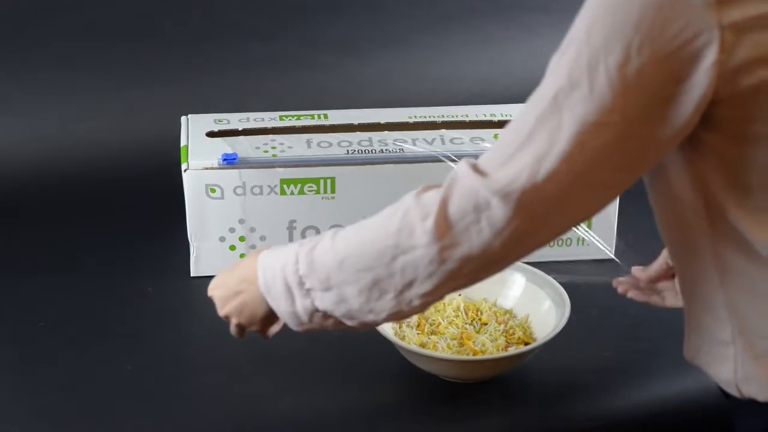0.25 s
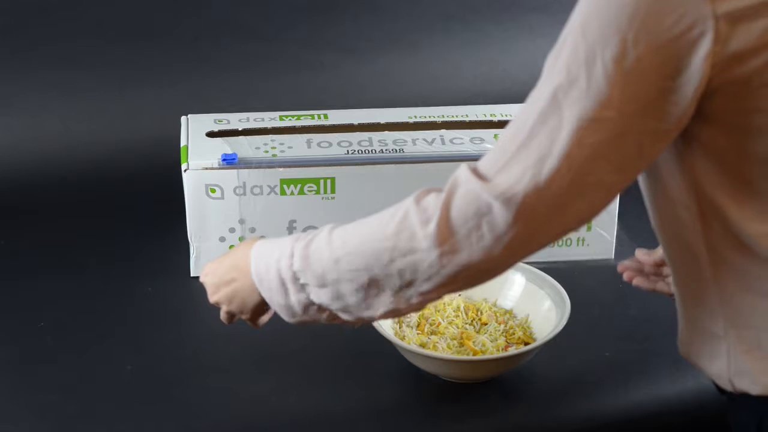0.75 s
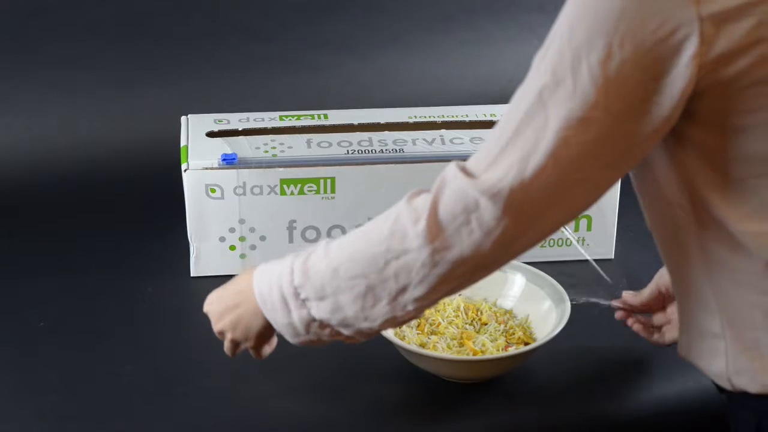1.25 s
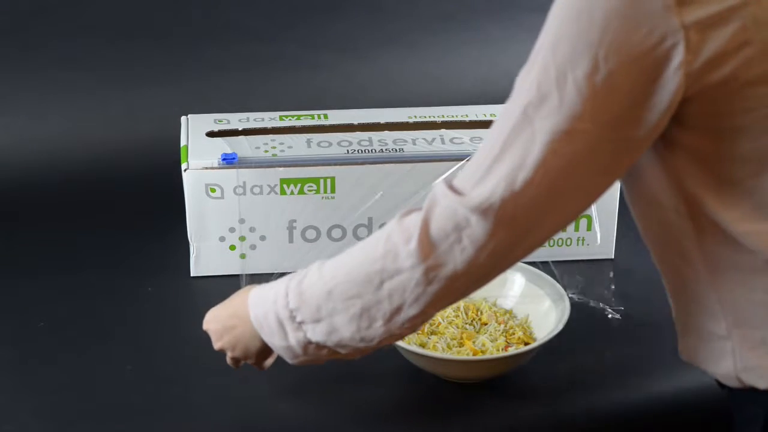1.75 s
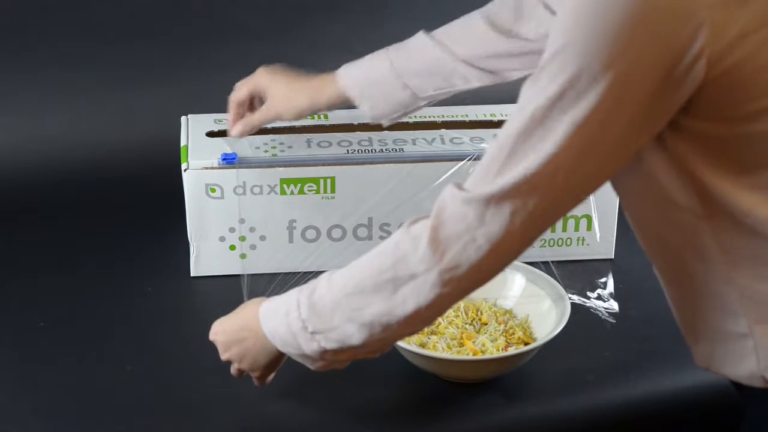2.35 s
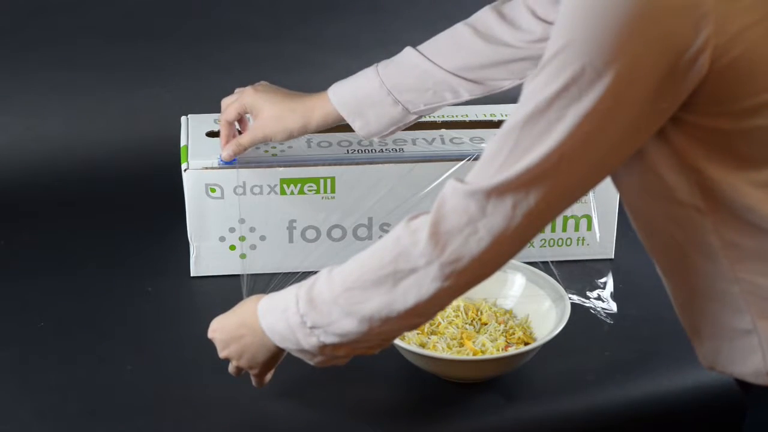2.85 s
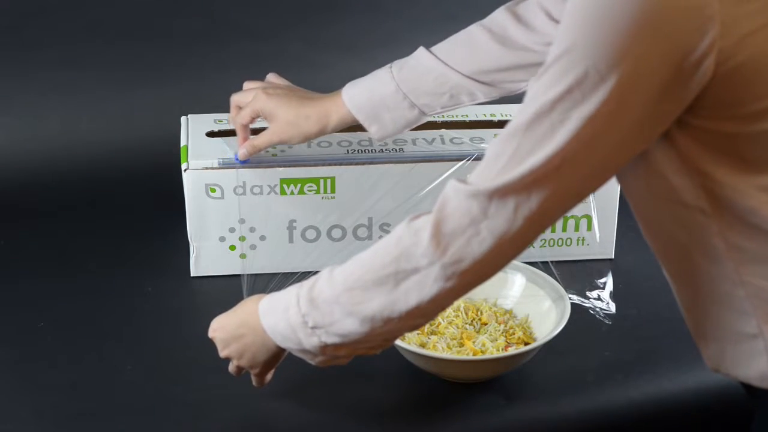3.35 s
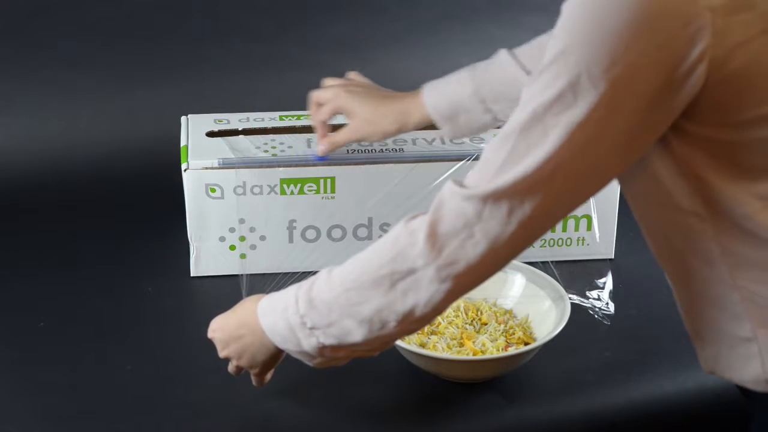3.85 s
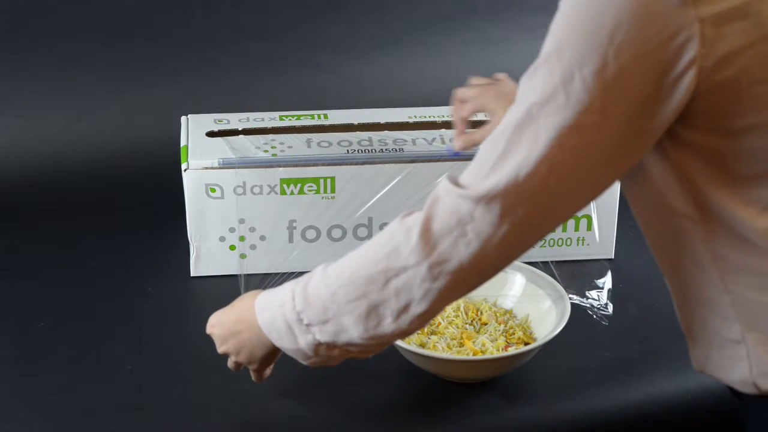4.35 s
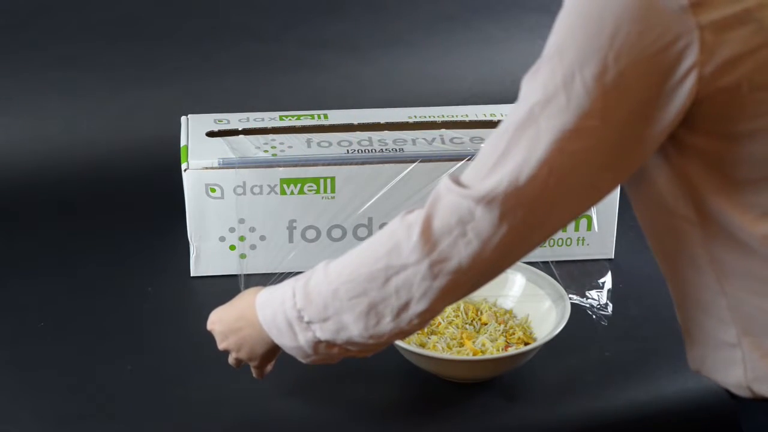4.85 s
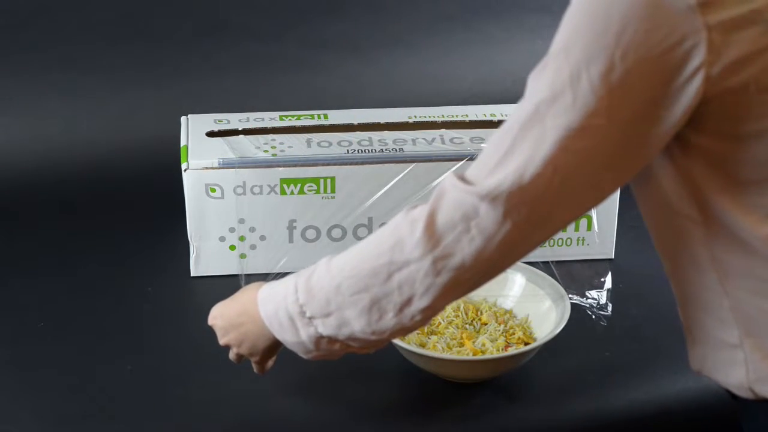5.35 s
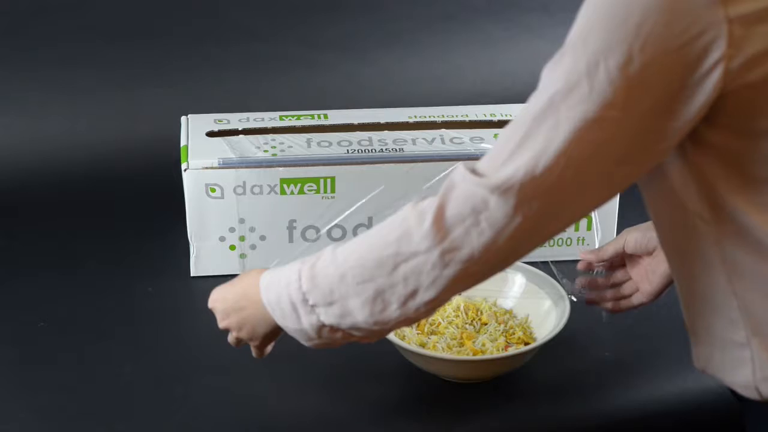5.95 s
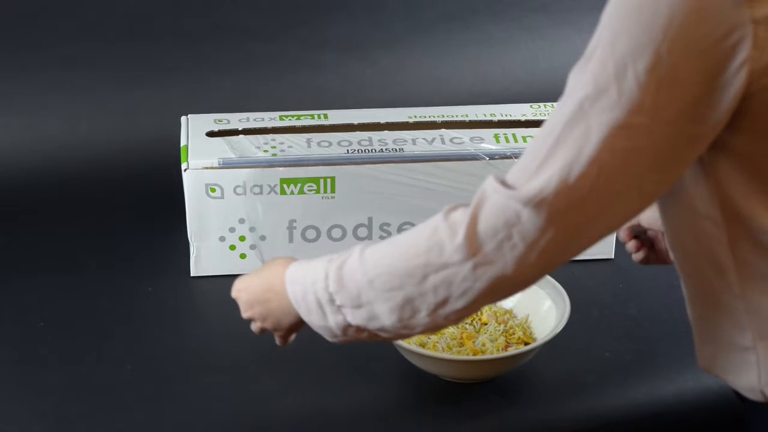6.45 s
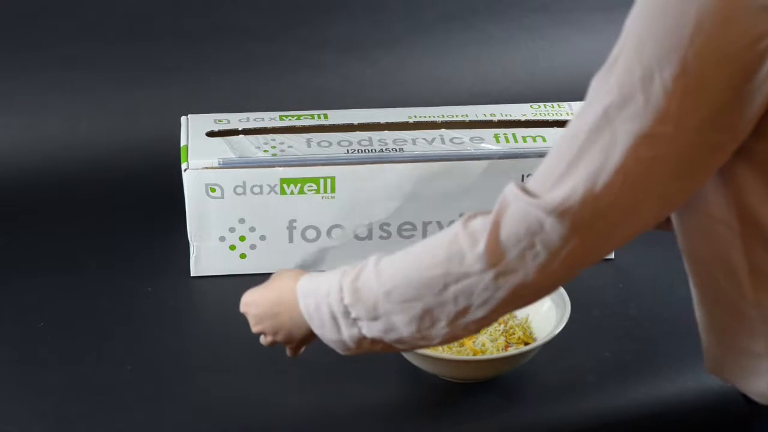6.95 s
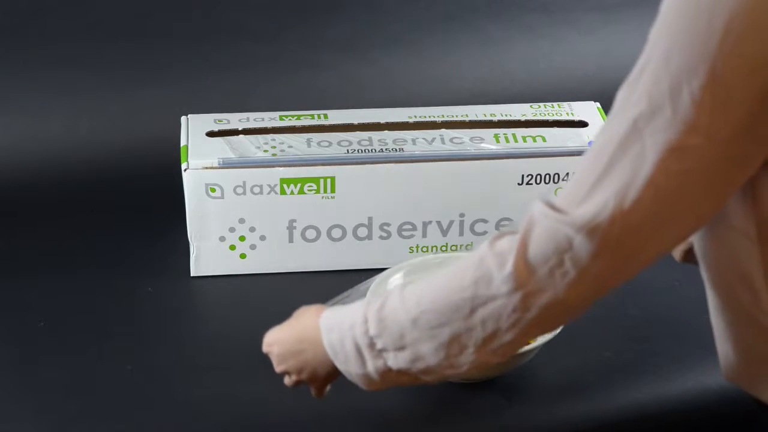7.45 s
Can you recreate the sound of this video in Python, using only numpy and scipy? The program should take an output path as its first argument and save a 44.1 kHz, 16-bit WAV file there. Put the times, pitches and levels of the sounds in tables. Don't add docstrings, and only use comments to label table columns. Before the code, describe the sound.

Crisp plastic wrap crackles, cutter clicks and a rising slicing hiss, then a flurry of sharp film snaps in a small room with faint hum.

```python
import sys
import numpy as np
from scipy import signal
from scipy.fft import rfft, irfft, next_fast_len
from scipy.io import wavfile
from scipy.ndimage import uniform_filter1d, map_coordinates

SR = 44100
rng = np.random.default_rng(int(sys.argv[2]) if len(sys.argv) > 2 else 0)


def master(y):
    cut = np.clip(np.atleast_2d(y).T, -1, 1)
    pcm = np.round(cut * 32767)
    wavfile.write(sys.argv[1], SR, pcm.astype(np.int16))


def attenuation_scalar(level_db):
    decades = np.asarray(level_db, float) / 20
    return 10 ** decades


N = 339129


def unit(x):
    return x / np.sqrt(np.mean(x ** 2) + 1e-20)


def along(points, hz):
    f, value = np.transpose(points)
    return np.interp(np.log(hz + 1), np.log(f + 1), value)


def curve(rows):
    return np.interp(np.arange(N) / SR, *np.transpose(rows), left=-120, right=-120)


def swells(rows, edge):
    t = np.arange(0, N + 64, 64) / SR
    gain = 0
    for middle, length, db in rows:
        distance = np.minimum(np.abs(2 * (t - middle) / length), 9)
        gain = gain + attenuation_scalar(db - 6 * distance ** edge)
    return np.interp(np.arange(N) / SR, t, gain)


def wandering(points, per_second):
    return map_coordinates(rng.standard_normal(points), [np.arange(N) / SR * per_second])


def filtered(x, response):
    m = next_fast_len(N + SR // 2)
    return irfft(rfft(x, m) * response(np.fft.rfftfreq(m, 1 / SR)), m)[:N]


def resonances(modes):
    def response(f):
        total = 0
        for k, (center, width, db) in enumerate(modes):
            damping = 1j * f * width
            total = total + (-1) ** k * attenuation_scalar(db) * damping / (center * center - f * f + damping)
        return total
    return response


def rush(spectrum, patchy_db):
    z = signal.stft(rng.standard_normal(N), nperseg=512)[2]
    field = uniform_filter1d(rng.standard_normal(z.shape), 6, 0)
    field = uniform_filter1d(field, 10, 1)
    noise = signal.istft(z * attenuation_scalar(patchy_db * unit(field)), nperseg=512)[1][:N]
    return unit(filtered(noise, lambda hz: attenuation_scalar(along(spectrum, hz)) * (hz < 15900)))


def crackle(s, follow_db, spread_ms, count):
    chance = rng.random((len(s), 4, count))
    late = -np.log(1 - chance[:, 0]) * spread_ms / 1000
    size = attenuation_scalar(19.5 * chance[:, 1]) * np.sign(chance[:, 2] - 0.5)
    size[:, 0], late[:, 0] = 0, 0
    size *= attenuation_scalar(follow_db) / np.linalg.norm(size, axis=1, keepdims=True)
    size[:, 0], chance[:, 3, 0] = 1, 0.5
    return s + late, size / np.sqrt(1 + attenuation_scalar(2 * follow_db)), 2 * chance[:, 3] - 1


def grains(s, hz, size, cycles, count=40):
    s, hz, size = s.reshape(-1, 1), hz.reshape(-1, 1), size.reshape(-1, 1)
    places = np.floor(s * SR).astype(int) + np.arange(count)
    turns = np.maximum(places / SR - s, 0) * hz
    envelope = turns / cycles * np.exp(1 - turns / cycles)
    wave = size * np.sin(2 * np.pi * turns) * envelope
    return np.bincount(places.ravel(), wave.ravel(), N + SR)[:N]


def pushes(s, size):
    return np.bincount((s.ravel() * SR).astype(int), size.ravel(), N + SR)[:N]


# f/Hz, level/dB (per Hz)
AIR_COLOUR = [(12, -66), (22, -2.5), (45, -12.5), (65, 1.5), (100, -3.5), (200, -3.5), (300, -9),
              (500, -14), (800, -15.5), (1200, -18), (1900, -21.5), (5000, -27), (10000, -29.5),
              (15800, -38)]
# middle t/s, length t/s, level/dB
DRONE_SURGES = [(0.15, 1, -51), (1.75, 0.13, -46), (3.19, 0.052, -45), (3.57, 0.2, -46), (4.2, 0.34, -47),
                (4.5, 0.2, -53), (4.85, 0.55, -49.5), (5.43, 0.21, -44.5), (6.08, .15, -50),
                (7.45, 0.9, -52.5)]


def air():
    drone_hz = 72 + 6 * wandering(200, 14)
    drone = np.sqrt(2) * np.sin(2 * np.pi * np.cumsum(drone_hz) / SR)
    drone_gain = attenuation_scalar(-9.5) * (attenuation_scalar(-61.5) + swells(DRONE_SURGES, edge=2.8))
    return attenuation_scalar(-51.5) * rush(AIR_COLOUR, patchy_db=0.4) + drone_gain * drone


# delay t/ms, level/dB
ECHOES = [(.45, -95), (2.049, -6), (3.549, -3), (4.3, -23), (5.2, -38), (5.9, -6.5)]
# f/Hz, time to fall 60 dB t/s, level/dB
ROOM_TAIL = [(302, 0.41, 1.5), (856, 0.13, 4), (2030, 0.28, -3.5), (5600, 0.19, -7), (9350, 0.19, -6),
             (14100, 0.26, -14)]


def room(x, near_db, wet_db):
    def copies(f):
        return 1 + sum(attenuation_scalar(db + near_db) * np.exp(-2j * np.pi * f * ms / 1000) for ms, db in ECHOES)
    early = filtered(x, copies)
    count = 4
    hz, t, z = signal.stft(rng.standard_normal((count, SR // 2)), SR, nperseg=256)
    t60 = along([(row[0], row[1]) for row in ROOM_TAIL], hz)[:, None]
    db = along([(row[0], row[2]) for row in ROOM_TAIL], hz)[:, None]
    tails = signal.istft(z * attenuation_scalar(db - 60 * t / t60), SR, nperseg=256)[1]
    turn = np.arange(N) // 1500 % count == np.arange(count)[:, None]
    late = signal.fftconvolve(x * turn, tails / np.linalg.norm(tails[0]), axes=1).sum(0)
    return early + attenuation_scalar(wet_db) * np.pad(late, (150, 0))[:N]


# f/Hz, level/dB (per Hz)
CLOTH_COLOUR = [(600, -39), (1000, 1), (2000, 0.5), (4000, -3.5), (6000, -4), (8700, 0), (10500, -5.5),
                (13000, -16), (16000, -26)]
# middle t/s, length t/s, level/dB
SLEEVE = [
    (1.87, 0.51, -57),
    (2.33, 0.19, -58.5),
    (2.8, 0.57, -60),
]


def sleeve():
    return swells(SLEEVE, edge=3.4) * rush(CLOTH_COLOUR, patchy_db=0.6)


# f/Hz, level/dB (per Hz)
RUB_COLOUR = [(1500, -33), (2500, -11), (3600, -4), (5000, -1), (6000, -2), (8800, 2), (11000, -5),
              (13000, -22), (16000, -34)]
# f/Hz, width/Hz, level/dB
RAIL = [(3500, 500, -5), (5600, 270, 2), (6900, 800, 3.5), (8800, 560, 3), (10300, 3500, -10)]
# t/s, level/dB
SLIDE = [
    (2.9, -69),
    (3.4, -66),
    (3.55, -58),
    (3.85, -55.5),
    (4.0, -51.5),
    (4.2, -51),
    (4.5, -57),
    (4.65, -57),
    (5.05, -73),
]
# middle t/s, length t/s, level/dB
FLUTTER = [
    (0.05, 0.96, -62.5),
    (5.16, 0.16, -61),
    (6.77, .3, -64),
    (7.0, .18, -51),
    (7.17, 0.073, -53.5),
    (7.7, 0.4, -63),
]


def rubbing():
    slips = rng.random((4000, 3))
    slip_size = attenuation_scalar(25 * slips[:, 1]) * np.sign(slips[:, 2] - 0.5)
    fizz = filtered(pushes(slips[:, 0] * N / SR, slip_size), resonances(RAIL))
    grip = wandering(700, 70)
    hiss = attenuation_scalar(1.3 * grip) * (rush(RUB_COLOUR, patchy_db=1.2) + 0.85 * unit(fizz))
    return attenuation_scalar(-3.0) * (attenuation_scalar(curve(SLIDE)) + swells(FLUTTER, edge=1.7)) * hiss


# f/Hz, width/Hz, level/dB
BOX = [(308, 47, -0.5), (544, 110, 2), (771, 109, 4), (1008, 220, 2), (1345, 155, -6.5)]
# t/s, level/dB, f/Hz, box drum level/dB
KNOCKS = [
    (2.6808, -39, 3560, -10.5),
    (2.8030, -25, 3580, -22),
    (4.2224, -34.5, 3500, -6.5),
    (5.3015, -24, 3500, -17),
]
# t/s, level/dB, f/Hz, box drum level/dB
TAPS = [(0.0792, -53, 1020, 9), (1.196, -54, 1250, -15), (2.5822, -42, 1170, -1.5), (2.723, -44.5, 1150, 1),
        (2.7444, -43.5, 1540, -5), (2.8054, -33, 1304, -3.5), (3.4408, -47.5, 1200, 7.5),
        (3.6644, -48, 1090, 0), (3.994, -45.5, 1060, -26), (4.2314, -37.5, 1026, -18),
        (5.2838, -44, 1130, -16), (5.3116, -40.5, 960, -6), (5.474, -42, 1180, -15),
        (5.4837, -30.5, 1390, -11), (5.4996, -35.5, 1160, -2)]


def taps():
    s, db, hz, drum_db = np.transpose(KNOCKS + TAPS)[..., None]
    knock = np.arange(len(s))[:, None] < len(KNOCKS)
    body_db = np.where(knock, -7.5, -0.5)
    follow_db = np.where(knock, 0.5, 15)
    when, size, scatter = crackle(s, follow_db, spread_ms=1.7 * attenuation_scalar(0.7 * follow_db), count=24)
    chatter = grains(when, hz * np.exp(0.24 * scatter), size * attenuation_scalar(db - 2.5), cycles=1.9, count=300)
    tick = grains(when, 7500 * np.exp(0.3 * scatter), size * attenuation_scalar(db - 3.0), cycles=0.7)
    track_hz = 2300 * np.exp(rng.uniform(-0.46, 0.5, when.shape))
    body = grains(when, track_hz, size * attenuation_scalar(db + body_db + 2), cycles=1.13, count=150)
    drum = filtered(pushes(when, size * attenuation_scalar(db + drum_db + 32.0)), resonances(BOX))
    return chatter + tick + body + drum


# t/s, level/dB, box drum level/dB, slap level/dB
SNAPS = [(0.1096, -42, -0.5, -9), (0.2118, -44, -6, -1), (0.342, -26, -10.5, -3), (0.4278, -18, -8, -6.5),
         (0.5303, -41.5, -12, -2), (0.6207, -34.5, 2, 2.5), (1.2324, -47.5, 8.5, 5.5),
         (1.4987, -27.5, -4.5, 0.5), (3.4852, -40.5, -16, -2), (3.6402, -38, -3, -23),
         (4.1272, -41, -17, -18), (4.5857, -34, -23, -26), (5.1343, -37.5, -19, -21),
         (6.0848, -37.5, -27, -22), (6.337, -39, -26, -15), (6.3878, -27, -8, -5), (6.4162, -21, -9.5, -9),
         (6.5008, -25, -24, -13), (6.532, -25.5, -18, -20), (6.5615, -34.5, -5.5, -1),
         (6.6667, -31, -8, -4), (6.7100, -36, -6, -6), (6.8198, -18, -5, 2), (6.8506, -25, -13, -12),
         (6.881, -24.5, -22, -2), (6.9152, -22.5, -6, -16), (6.949, -29, -10, 0.5), (7.0201, -37, 0, 4),
         (7.1298, -34.5, -4, 7), (7.3327, -45.5, -7, -10)]
# t/s, level/dB, box drum level/dB, slap level/dB
PULL = [(0.033, -44, 8, 1), (0.068, -48.5, 3, 6), (0.156, -45, -12, -12), (0.189, -46, -9, -11),
        (0.264, -42.5, -5, -14), (0.329, -37, -14, -3), (0.3325, -26, -5, -6), (0.41, -30, -6, -7),
        (0.418, -26.5, -14, -14), (0.4245, -22.5, 1, 1.5), (0.433, -29, 7, -12), (0.445, -38, 0, 7.5),
        (0.51, -41, -14, -12), (0.624, -41, -3, -14), (0.646, -50.5, 15.5, 0), (0.737, -48, 1, -18),
        (0.822, -48.5, 0, -10), (1.129, -44.5, 2, -2), (1.479, -39, 4, -4), (1.488, -44, 7, -5),
        (1.501, -34, 3.5, 4.5), (1.524, -49, 10, -5), (1.5694, -44.5, -10, -16), (1.645, -47, -3, 3)]
# t/s, level/dB, box drum level/dB
CUT = [(3.121, -37.5, -22), (3.15, -38.5, -8), (3.327, -41, -15), (3.426, -54, -4), (3.573, -36.5, -14),
       (3.588, -34.5, -11), (3.648, -31, -5), (3.657, -33.5, -1), (3.734, -44.5, 5), (3.95, -40.5, -4),
       (3.986, -42, -12), (4.013, -46, -18), (4.168, -43.5, -12), (4.277, -41, -5), (4.288, -49, -16),
       (4.406, -43, -6), (4.45, -39.5, -7), (4.52, -44.5, -4), (4.63, -44, -23), (5.094, -49, -10),
       (5.161, -54, -5), (5.191, -47, -15), (5.7, -47, -10)]
# t/s, level/dB, box drum level/dB, slap level/dB
STRETCH = [(6.08, -34.5, -8, 1), (6.293, -46, -17, -18), (6.353, -44, -5, -5), (6.386, -30.5, -7, 0.5),
           (6.417, -30, -8, 0), (6.4413, -25.5, -3.5, -2.5), (6.454, -26, -15, -10), (6.475, -38, -1, -2),
           (6.659, -41, -4, 2), (6.731, -51, 9, 9), (6.797, -36.5, -18, -6), (6.8166, -36.5, 9.5, 0),
           (6.829, -20, 0.5, -6), (6.842, -30, 5, -13), (6.857, -37, -8, 3), (6.87, -27, 0, -16),
           (6.876, -26, -11, -6), (6.888, -34.5, 5, -14), (6.898, -37, -10, 6), (6.917, -34.5, -11, 11.5),
           (6.964, -37.5, 2, 3), (6.99, -41, -1, -5), (7.039, -35, -4, 3.5), (7.066, -53, 6, 10),
           (7.107, -42, -4, 9), (7.151, -46, -2, -2), (7.172, -35.5, -14, -11), (7.606, -47.5, -2, 3),
           (7.64, -43.5, -4, -10), (7.677, -34.5, -5, -6)]
# t/s, f/Hz
TENSION = [(0.05, 8050), (0.35, 6850), (1.5, 8300), (3.15, 9200), (3.6, 8100), (4.3, 7700), (5.15, 6900),
           (6.1, 8200), (6.53, 8450), (6.8, 7800), (7.15, 7360), (7.68, 8040)]


def releases():
    cut = [tuple(row) + (-15,) for row in CUT]
    s, db, drum_db, slap_db = np.transpose(SNAPS + PULL + cut + STRETCH)[..., None]
    hz = np.interp(s, *np.transpose(TENSION)) * np.exp(0.04 * rng.standard_normal(s.shape))
    follow_db = -5 + 0.14 * (db + 40.5)
    follow_db[len(SNAPS):] = 9
    return s, db, hz, drum_db, slap_db, follow_db


def film():
    s, db, hz, drum_db, slap_db, follow_db = releases()
    spread_ms = 2.2 * attenuation_scalar(0.4 * follow_db)
    when, size, scatter = crackle(s, follow_db, spread_ms, count=22)
    click_size = size * attenuation_scalar(db + 8.5 + 0.1 * follow_db)
    clicks = grains(when, hz * np.exp(0.37 * scatter), click_size, cycles=0.53)
    edge_hz = np.minimum(1.2 * hz, 14000) * np.exp(0.13 * scatter)
    edge = grains(when, edge_hz, size * attenuation_scalar(db - 2.0 - 0.59 * follow_db), cycles=0.82)
    sheet_hz = 2900 * np.exp(rng.uniform(-0.47, 1.0, when.shape))
    slap = grains(when + 0.000455, sheet_hz, size * attenuation_scalar(db + slap_db + 2.5), cycles=0.52, count=90)
    drum = filtered(pushes(when + 0.001816, size * attenuation_scalar(db + drum_db + 24.5)), resonances(BOX))
    return clicks + edge + slap + drum


def scene():
    cutter = room(taps(), near_db=-7.5, wet_db=-7.5)
    wrap = room(film(), near_db=-2.06, wet_db=-2)
    return (wrap + cutter + rubbing() + sleeve() + air())[None]


def low_pass(x):
    return signal.sosfilt(signal.butter(12, 17000, fs=SR, output="sos"), x)


# f/Hz, level/dB
TREBLE_END = [(9000, 0.5), (12000, 2), (15700, 6), (16000, -14), (16600, -22), (16700, -90)]


def record(dry):
    heard = filtered(dry[0], lambda hz: attenuation_scalar(along(TREBLE_END, hz)))
    return low_pass(heard[None])


dry = scene()
out = record(dry)
master(out)
```